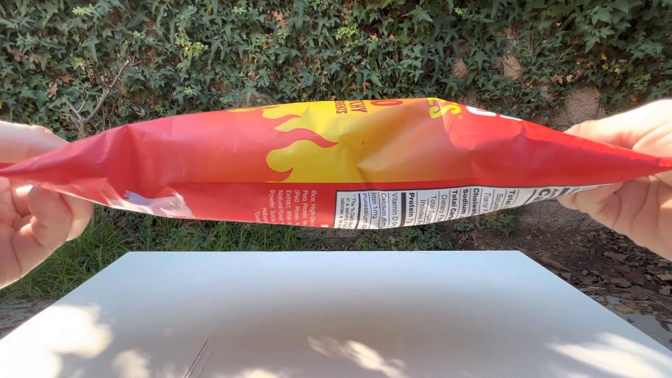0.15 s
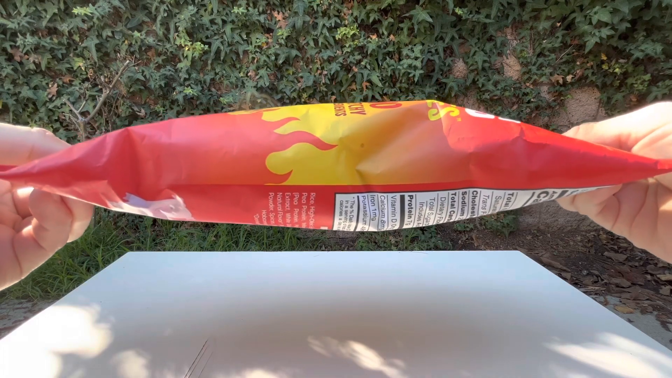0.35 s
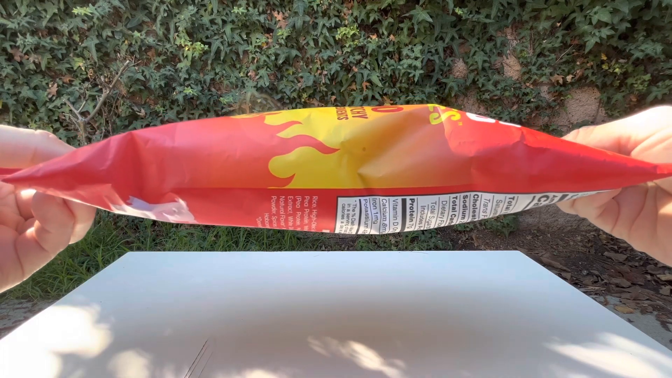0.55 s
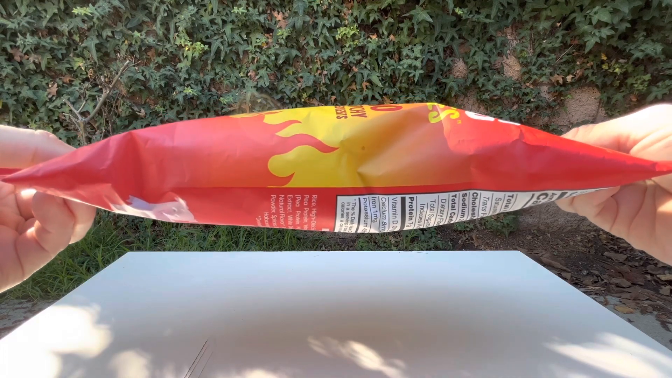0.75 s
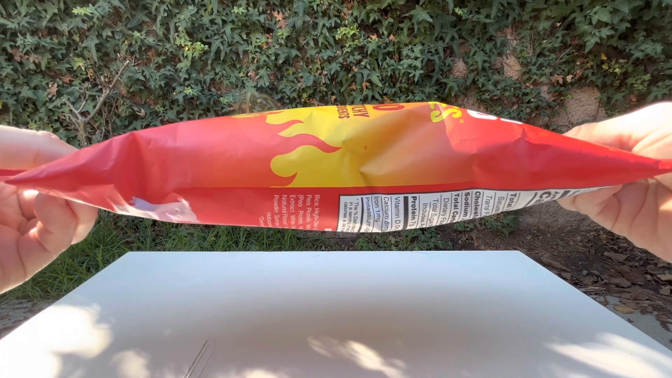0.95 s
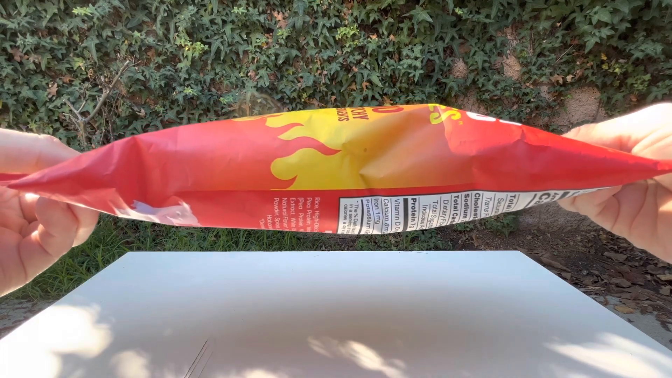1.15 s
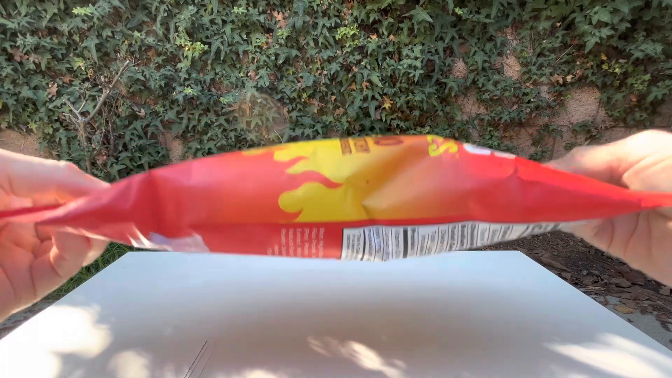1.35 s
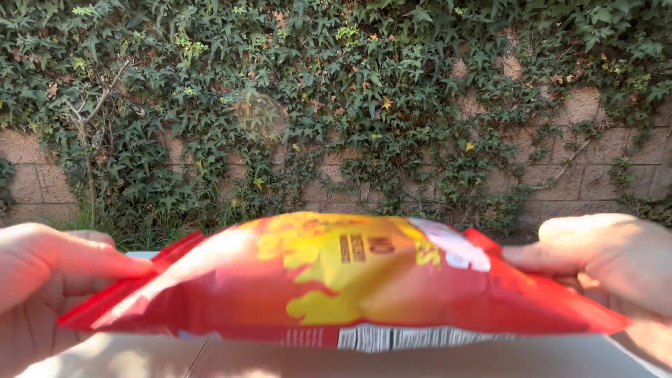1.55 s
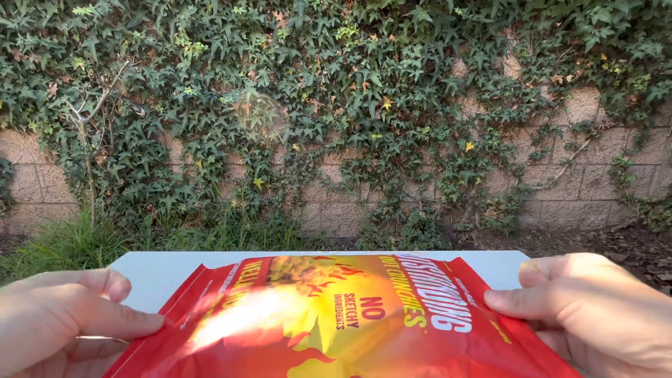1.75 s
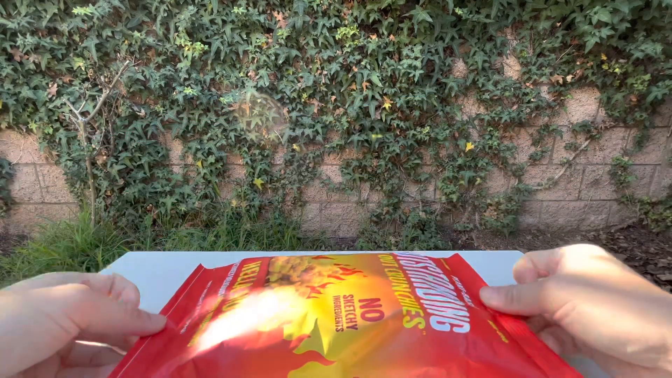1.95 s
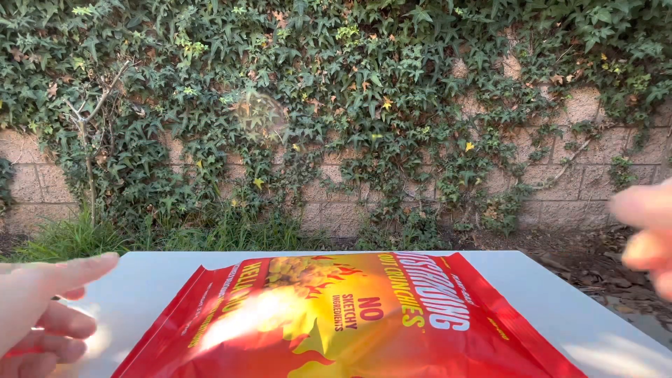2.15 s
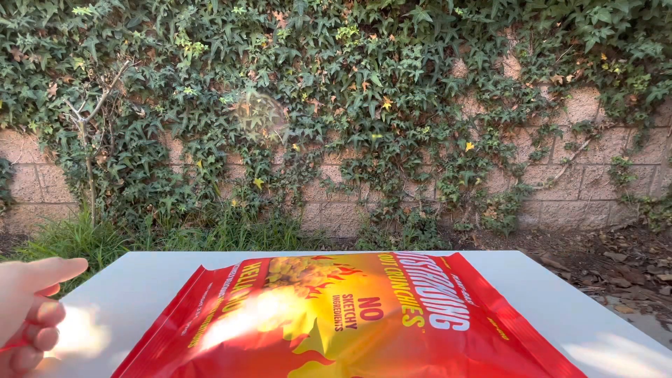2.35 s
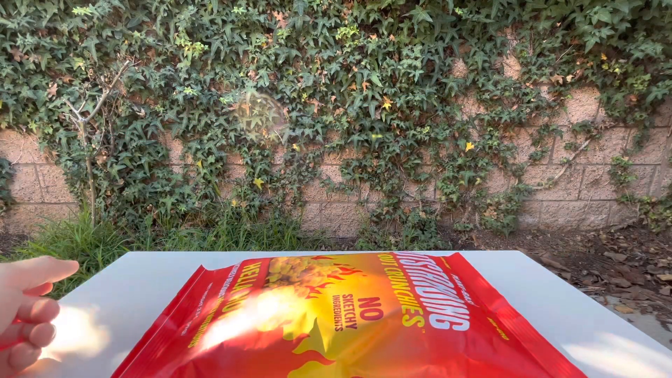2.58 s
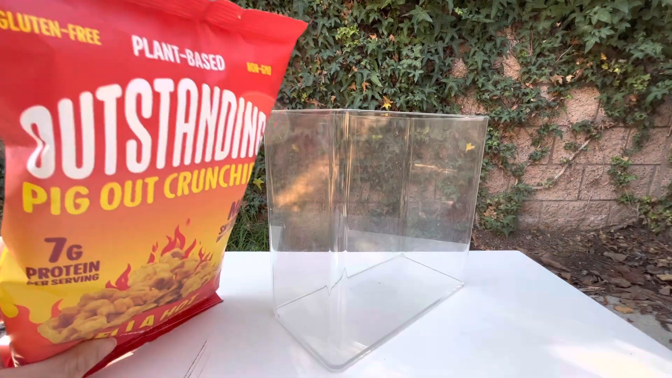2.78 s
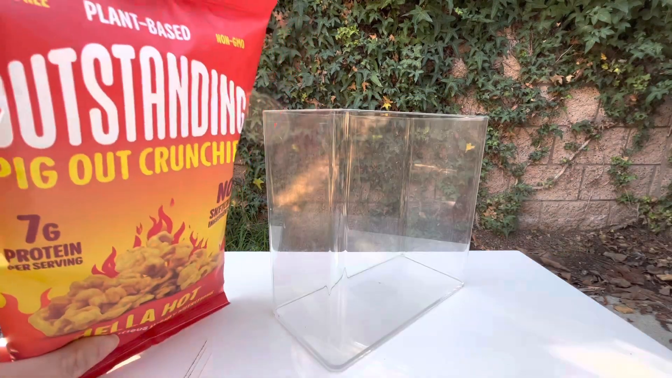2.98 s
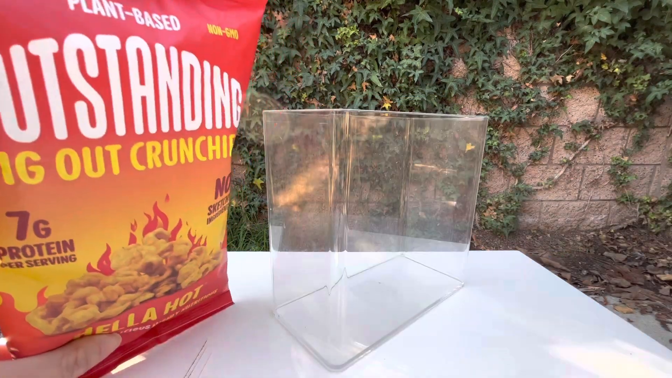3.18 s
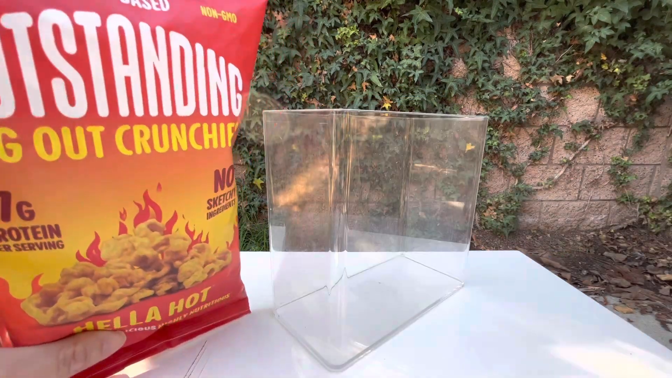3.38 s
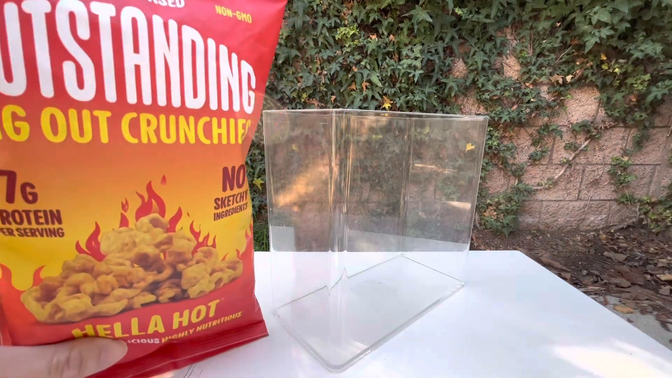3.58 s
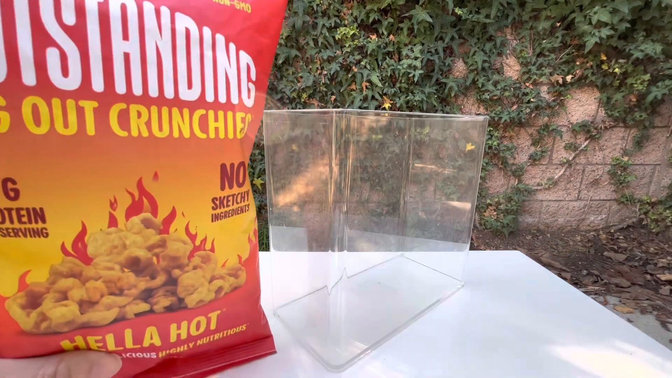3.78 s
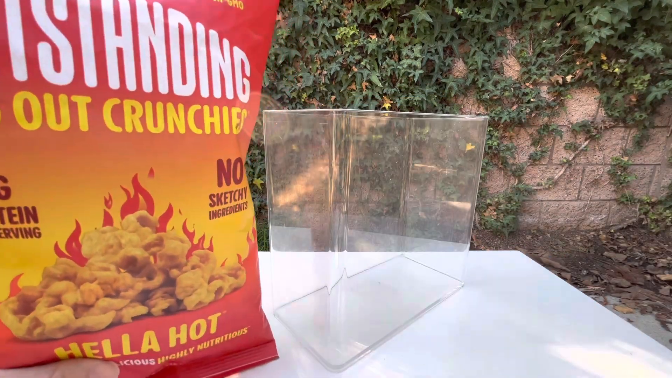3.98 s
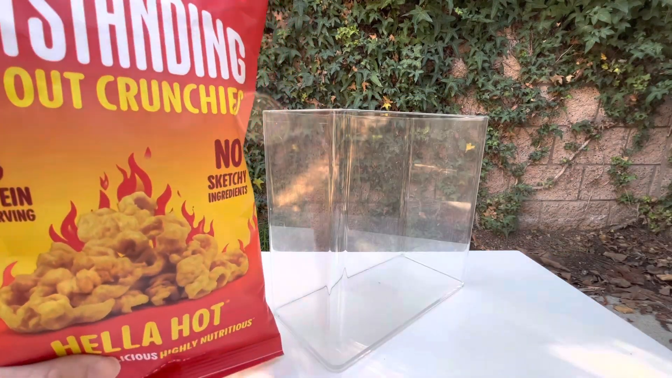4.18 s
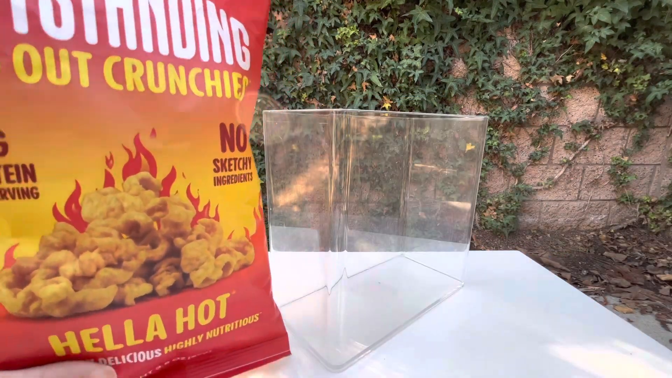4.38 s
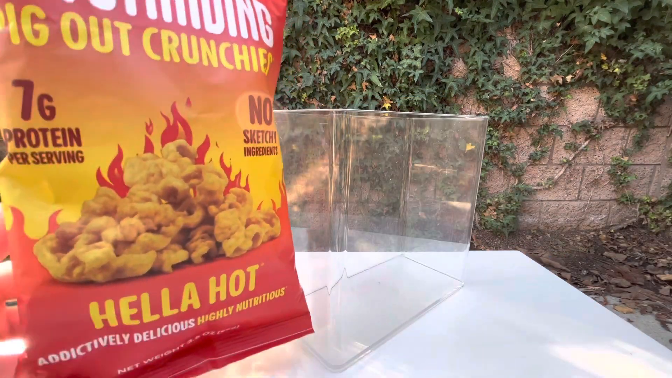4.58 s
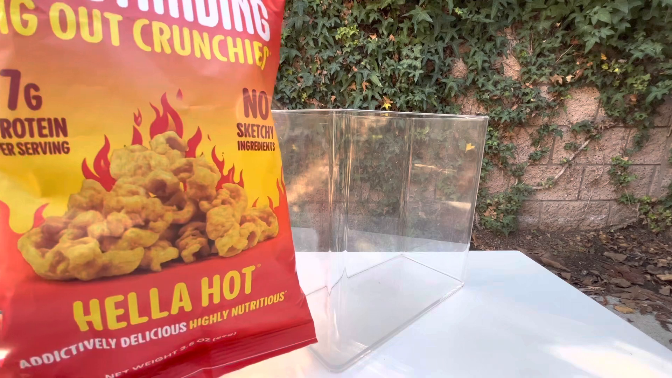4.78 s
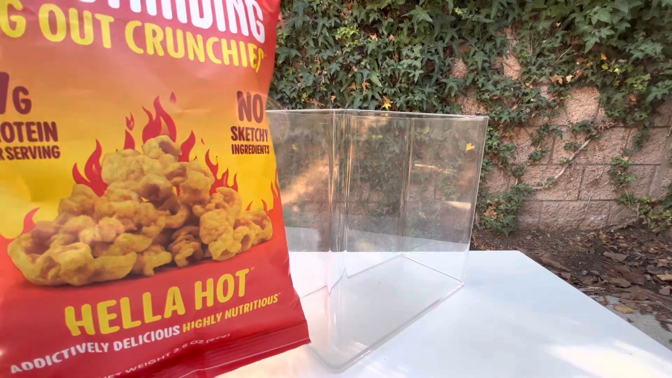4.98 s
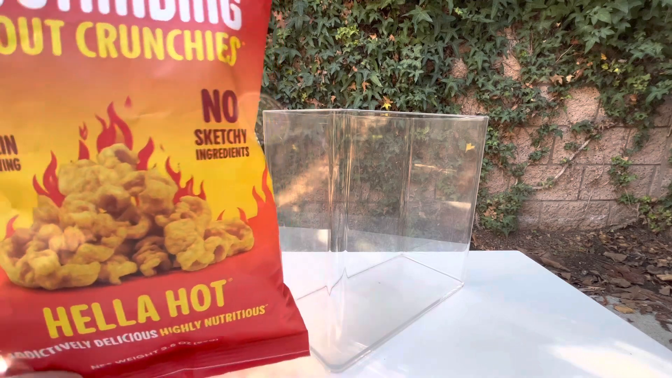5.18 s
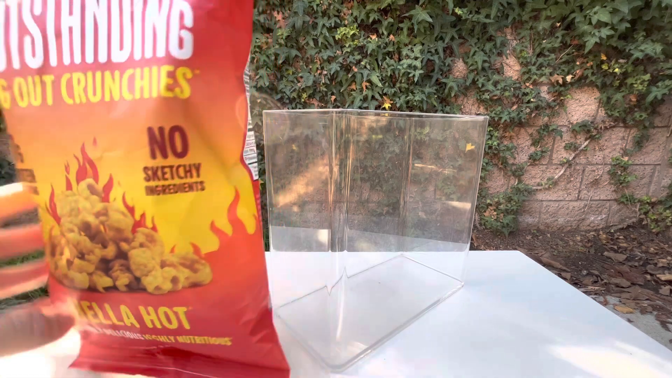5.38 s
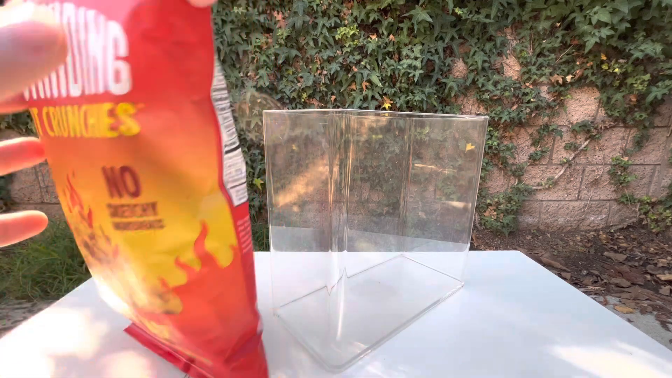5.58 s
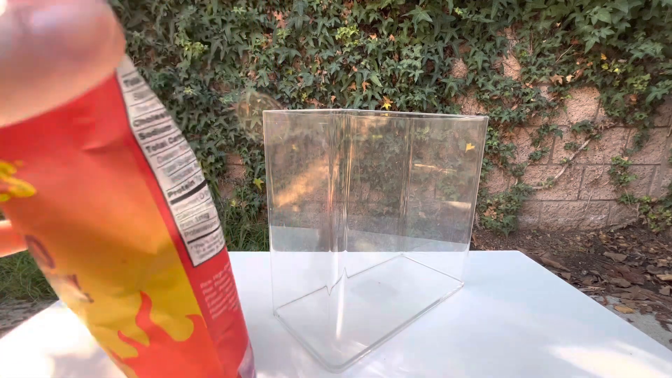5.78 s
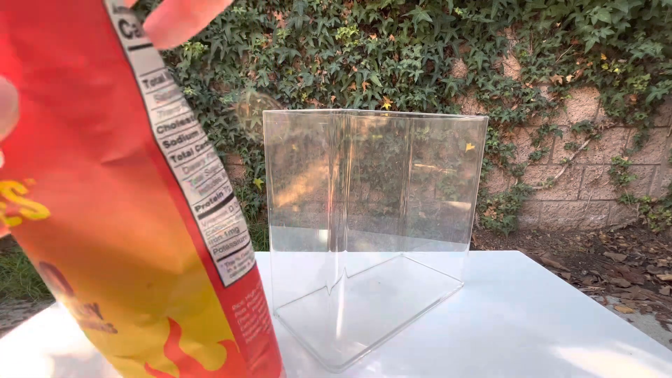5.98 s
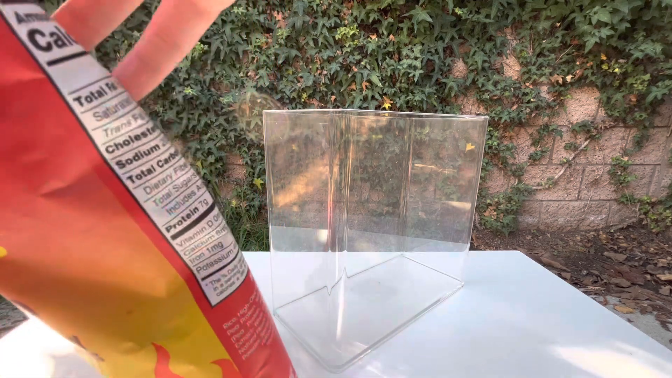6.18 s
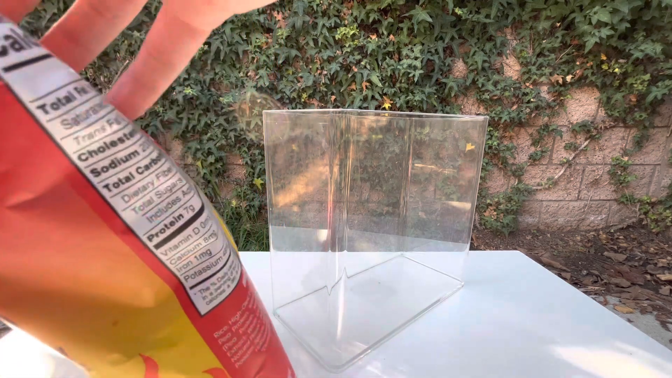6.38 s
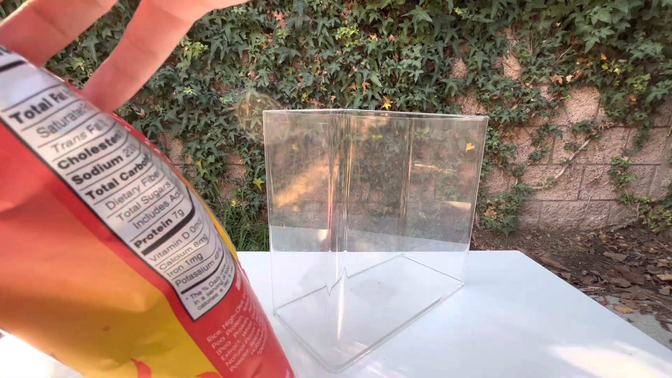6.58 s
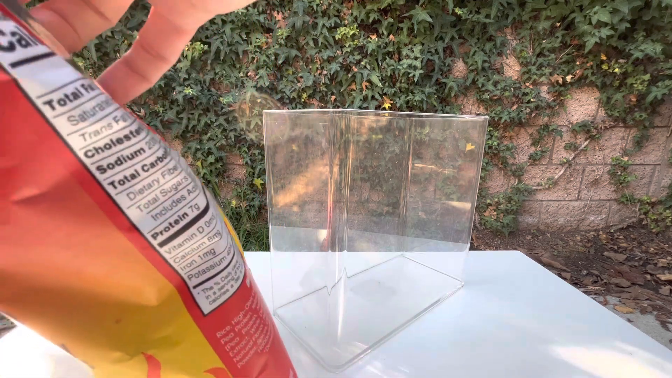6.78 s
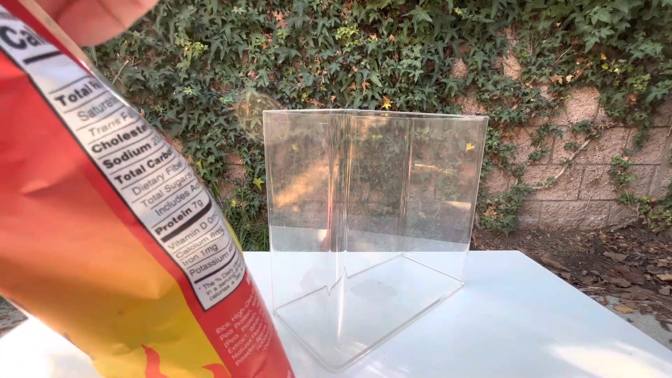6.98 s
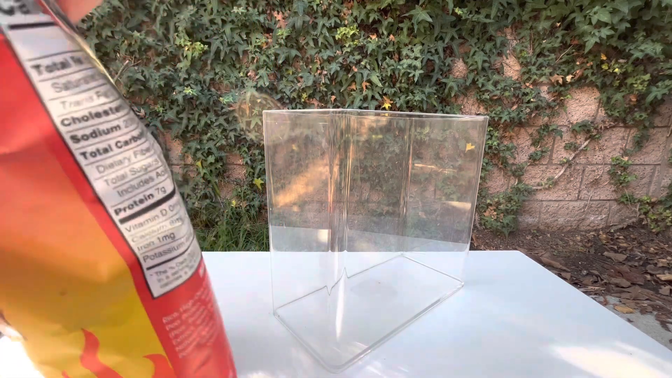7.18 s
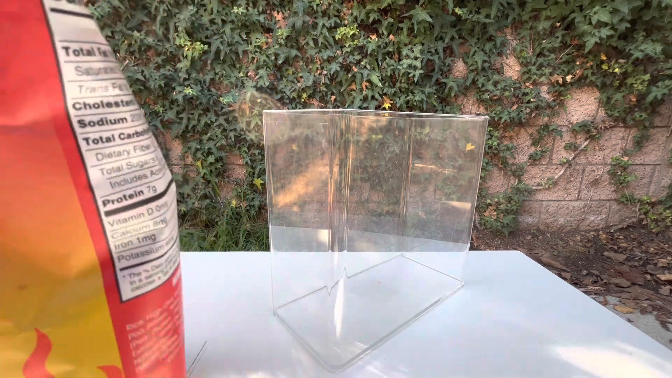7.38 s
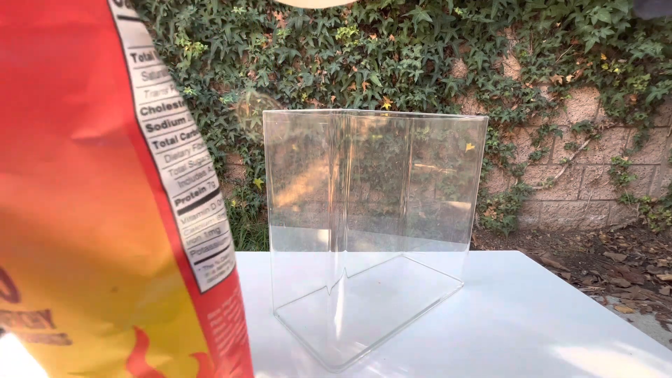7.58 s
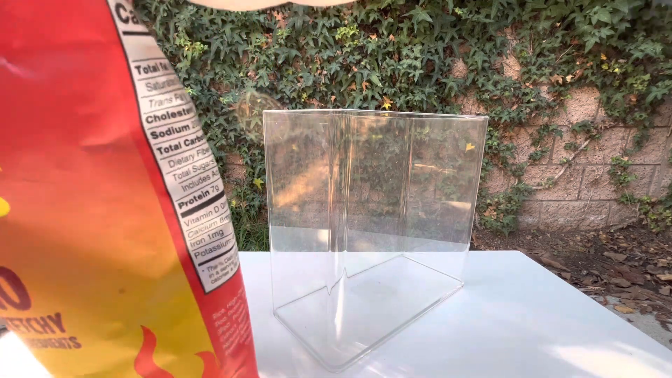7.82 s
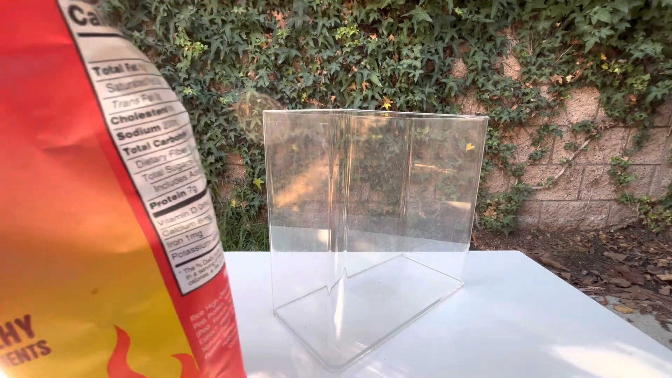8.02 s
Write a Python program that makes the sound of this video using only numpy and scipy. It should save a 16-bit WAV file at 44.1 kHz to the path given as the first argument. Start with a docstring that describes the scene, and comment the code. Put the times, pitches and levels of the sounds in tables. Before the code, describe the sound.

A filled snack bag is handled and tugged close by, sparse film snaps building to continuous bright crackle, with faint birdsong and distant engine hum.

```python
"""A plastic snack bag, left of a close microphone pair, is pulled at both ends, laid on a garden table,
then stood up and tugged at the top. Noise bursts make the sharp snaps of its stiff film, sine swings its thumps;
shaped noise and short rings make the rustle of creases and shifting pieces, fluttering hiss the sliding fingers.
Behind it, shaped noise is outdoor air and gliding tones are a bird. A wavering tone is a low hum at first;
once the scene changes, another is a distant engine that slows and picks up again."""
import sys
import numpy as np
from scipy import signal
from scipy.fft import rfft, irfft
from scipy.io import wavfile
from scipy.ndimage import uniform_filter1d

SR = 44100
rng = np.random.default_rng(int(sys.argv[2]) if len(sys.argv) > 2 else 0)


def int16_out(signal):
    """Quantize to a 16-bit WAV file."""
    q = np.round(np.clip(np.atleast_2d(signal).T, -1, 1) * 32767)
    wavfile.write(sys.argv[1], SR, q.astype(np.int16))


N = 355005
TIME, HZ = np.arange(N) / SR, np.fft.rfftfreq(N, 1 / SR)


def amp(db):
    """Turns decibels into gain."""
    return 10 ** (np.asarray(db) / 20)


def unit(x):
    """Scales a sound to an rms of 1."""
    return x / np.sqrt(np.mean(x ** 2) + 1e-30)


def read(points, hz):
    """Reads a table between its points, on a log-frequency axis."""
    f, value = np.transpose(points)
    return np.interp(np.log(hz + 1), np.log(f + 1), value)


def add(mix, s, sound):
    """Mixes a sound in at time s (seconds)."""
    part = mix[..., max(round(s * SR), 0):][..., :sound.shape[-1]]
    part += sound[..., :part.shape[-1]]


def drift(per_s, step=100):
    """Slow random motion of rms 1: low-passed noise, drawn every few samples and joined by lines."""
    count = N // step + 2
    hz = np.fft.rfftfreq(count, step / SR)
    smooth = np.exp(-(hz / per_s) ** 2)
    slow = irfft(rfft(rng.standard_normal(count)) * smooth, count)
    return np.interp(np.arange(N) / step, np.arange(count), unit(slow))


def pair(x, likeness):
    """Mixes two unrelated signals into left and right spectra that are alike by a set amount."""
    one, other = rfft(x)
    same = np.clip(read(likeness, HZ), -1, 1)
    return np.array([one, same * one + np.sqrt(1 - same ** 2) * other])


# Outdoor air in each scene, before the bass trim. Columns: f/Hz, level/dB per Hz
FIRST_AIR = [(25, -43), (45, -3), (70, -10.5), (105, -3.5), (141, -18.5), (210, -24.5), (320, -26),
             (520, -32.5), (1150, -31), (1600, -35), (2100, -48.5), (2800, -57), (6000, -62.5),
             (16000, -79)]
SECOND_AIR = [(25, -19), (45, -2), (70, -1.5), (92, -0.5), (120, -13), (223, -10), (489, -22.5), (800, -17),
              (1100, -19), (1550, -16.5), (2300, -32), (4000, -39.5), (6500, -60), (13000, -64),
              (16000, -73)]
# How alike the air is at left and right. Columns: f/Hz, likeness (-1 to 1)
AIR_LIKENESS = [(60, 0.78), (130, 0.95), (290, 0.56), (640, -0.46), (1410, -0.15), (6800, 0.059),
                (15000, 0.74)]
FIRST_AIR_DB, SECOND_AIR_DB = -60.5, -51  # level above 150 Hz of left and right averaged


def air(colour, db, bass_db):
    """Far traffic and leaves reach us from all around as almost steady, coloured noise."""
    spectra = pair(rng.standard_normal((2, N)), AIR_LIKENESS) * amp(read(colour, HZ))
    level = np.std(irfft(spectra.mean(0) * (HZ > 150), N))
    bass_trim = amp(bass_db / (1 + (HZ / 130) ** 4))
    waver_db = .3 * drift(4)
    return irfft(spectra * bass_trim, N) / level * amp(db + waver_db)


def drone(hz, level_db, second_db, waver):
    """A low tone and its octave waver together in pitch and level, as turning machines do."""
    phase = 2 * np.pi * np.cumsum(hz * (1 + waver * drift(9.5))) / SR
    tones = np.sin(phase) + amp(second_db) * np.sin(2 * phase)
    return np.sqrt(2) * amp(level_db + 0.9 * drift(4.0)) * tones


# Loudness of the low hum, before trim. Columns: t/s, level/dB
HUM_LEVEL = [(0, -54.5), (.5, -50), (1.2, -60.5), (1.4, -53), (1.75, -51), (2.4, -48), (2.75, -53.5)]
HUM_HZ = 104.8  # average pitch


def hum(trim_db=0.4):
    """A machine somewhere off hums around one pitch, with a faint octave."""
    t, level_db = np.transpose(HUM_LEVEL)
    return drone(HUM_HZ, np.interp(TIME, t, level_db) + trim_db, second_db=-27, waver=0.0054)


def yard(x, db, t60, size=16000):
    """Table and ivy wall scatter the sound: sparse, dull random echoes that fall 60 dB in t60 seconds."""
    t = np.arange(size) / SR
    sparse = rng.standard_normal((2, size)) * (rng.random((2, size)) < 1 / 16)
    echoes = sparse * amp(-60 * t / t60) * (t > .004)
    echoes = signal.lfilter(*signal.butter(1, 4000, fs=SR), echoes)
    return amp(db) * signal.oaconvolve(x, echoes / np.linalg.norm(echoes[0]), axes=1)[:, :N]


# Bird chirps, before pitch smoothing and the direct/echo mix.
# Columns: t/s, length/s, start f/Hz, top f/Hz, end f/Hz, level/dB
CHIRPS = [(.17, .08, 3600, 3780, 3600, -80), (0.598, 0.11, 3530, 3650, 3250, -76),
          (.75, .08, 3640, 3800, 3650, -80), (0.96, .085, 3000, 3650, 2260, -62),
          (2.465, 0.065, 3120, 3260, 2890, -64.5), (2.507, 0.058, 3280, 3760, 3540, -72.5)]


def bird(warble=850):
    """A far bird glides up and down in thin, slightly rough tones, blurred by echoes of the garden."""
    out = np.zeros(N)
    for s, length, start, top, end, db in CHIRPS:
        u = np.linspace(0, 1, int(length * SR))
        hz = uniform_filter1d(np.interp(u, [0, .55, 1], [start, top, end]), SR // 60)
        hz += warble * uniform_filter1d(rng.standard_normal(len(u)), 60)
        swell = np.sin(np.pi * u)
        add(out, s, amp(db) * swell * np.sin(2 * np.pi * np.cumsum(hz) / SR))
    return 0.65 * out + yard(out[None], db=-8, t60=0.23)


# Colour of the bag. Columns: f/Hz, level/dB per Hz
FILM = [(40, -11), (110, 0.5), (200, 1.5), (480, 0.5), (800, -1), (1150, 3), (2000, 1), (2800, -2),
        (5000, -4.5), (7000, -9), (9500, -16), (12000, -15), (14000, -21.5), (16500, -39)]


def film_band(lo, hi, size=2048):
    """The bag's response between two frequencies, starting as promptly as its colour allows (minimum phase)."""
    hz = np.fft.rfftfreq(size, 1 / SR)
    edges = np.sqrt((1 + (lo / (hz + 1)) ** 10) * (1 + (hz / hi) ** 10))
    log_gain = np.log(np.maximum(amp(read(FILM, hz)) / edges, 1e-4))
    circle = np.r_[log_gain, log_gain[-2:0:-1]]
    return np.fft.ifft(np.exp(signal.hilbert(circle).conj())).real[:size // 2]


def facets(size, ring_db=4, width=0.17):
    """Every buckle rings its own patch of film at one broad resonance, added to the plain sound."""
    hz, centre = np.fft.rfftfreq(size, 1 / SR), np.array(SNAPS)[:, -1:]
    return 1 + amp(ring_db) / (1 + 1j * (hz - centre) / (width * centre / 2))


# The loudest buckles; level over 5 ms, before band trims and ring.
# Columns: t/s, level/dB, brightness/dB per octave, ring f/Hz
SNAPS = [(0.413, -50, -4.5, 1890), (1.4007, -44, -4, 4100), (1.4141, -34.5, 2, 2210),
         (1.4335, -38, 1, 3940), (1.4627, -38, -4, 2360), (1.6058, -33.5, 0.7, 3980),
         (1.621, -29.5, 5, 3120), (1.7655, -30.5, 0.6, 1130), (1.78, -28, -2, 3020),
         (1.8377, -25, -0.8, 1580), (1.8644, -39.5, -2.5, 1730), (1.9921, -30.5, -3.5, 1110),
         (2.0142, -40.5, -2.5, 1210), (2.396, -67, -14, 1100), (2.6563, -47, -7, 1460),
         (2.9264, -41, -4, 1110), (2.9618, -37, -5.5, 1930), (3.209, -39, 1.7, 1120),
         (3.4923, -41.5, 4.5, 4390), (4.0656, -38.5, -3.5, 1716), (4.1483, -33.5, -0.7, 1850),
         (4.1725, -34.5, -3, 1990), (4.1836, -47.5, -8.5, 1200), (4.2544, -26.5, 0, 1590),
         (4.298, -34.5, -4.7, 1620), (4.3038, -37, 1, 1600), (4.3653, -30.5, -0.5, 1430),
         (4.3718, -31.5, 0, 1980), (4.4429, -31.5, -1.5, 1520), (4.5423, -29.5, 0, 4380),
         (4.562, -36, -6, 1100), (4.569, -32, 0.5, 2300), (4.589, -32.5, -4.5, 3380),
         (4.628, -38, -4, 4030), (4.695, -41, -4, 2700), (4.852, -29, 3, 3600), (5.0703, -35, 2.5, 1165),
         (5.1188, -38, 0.3, 2180), (5.1643, -23.5, -1, 2650), (5.2661, -38.0, -3.5, 1250),
         (5.3291, -33.5, 6.5, 4520), (5.385, -31, 1, 1420), (5.3951, -28, 0.2, 2300),
         (5.4043, -35, -6, 1180), (5.4622, -40.5, -6, 1230), (5.564, -25, -1, 1530),
         (5.6026, -34.5, -2.5, 1790), (5.6328, -31.5, 3.5, 1427), (5.658, -32, -3.1, 2050),
         (5.677, -33.0, 2, 2000), (5.6992, -20.5, 0.5, 1360), (5.7225, -33, 3.5, 5300),
         (5.7381, -23, 1.5, 4700), (5.803, -34, -3, 1210), (5.9566, -28.5, 2.5, 1275),
         (5.979, -19.5, 0.1, 1960), (5.9955, -20.0, 1.7, 1730), (6.018, -28.5, -1.5, 2210),
         (6.091, -23, 0.3, 1600), (6.139, -33, -4, 2020), (6.1459, -28.5, -1.2, 1840),
         (6.2834, -20.5, 1.5, 4030), (6.3165, -26, 0.5, 2100), (6.3289, -22.0, -1.5, 1990),
         (6.3512, -24.5, 0.9, 1390), (6.3767, -31, 0.0, 1800), (6.3841, -26.5, 0, 3530),
         (6.4286, -20.5, 2, 1850), (6.4709, -23.5, 0, 1740), (6.538, -21, 0, 2000), (6.605, -20, 0.5, 1313),
         (6.6321, -27.0, -2.5, 1350), (6.672, -23, 0.5, 1900), (6.6854, -22.5, -0.5, 1830),
         (6.692, -20, -0.8, 4900), (6.7402, -27.0, -1.3, 1710), (6.8004, -20, 1.3, 1940),
         (6.8335, -26, 0, 2000), (6.8583, -30.5, 0, 1990), (6.9182, -24, 3.5, 1940), (6.9305, -25, 2, 3420),
         (6.979, -30.5, -0.8, 1750), (7.036, -27.0, -3.0, 1950), (7.0604, -22, -0.2, 1596),
         (7.1078, -30.5, 5, 3310), (7.1125, -27.5, 2.8, 4060), (7.138, -17.5, 0.2, 3300),
         (7.1501, -18, 2.5, 3760), (7.1577, -22.5, 2.5, 4900), (7.1649, -17, 0, 1620),
         (7.197, -34, -6, 1260), (7.2322, -31, 1.5, 1387), (7.2838, -26, -1.5, 1280),
         (7.321, -24.5, 6, 5460), (7.387, -29, 3, 4495), (7.4015, -20.5, -1.5, 1720),
         (7.408, -24, 1.5, 1312), (7.4334, -27, 2.5, 4780), (7.448, -26, 4, 6730),
         (7.4666, -22.5, -2, 1960), (7.4912, -25.5, -2, 1880), (7.5276, -30.0, -4, 1620),
         (7.553, -15, 1.3, 1526), (7.5869, -31.5, 2.5, 4050), (7.6287, -27, -2.7, 1570),
         (7.6667, -25.5, 3.5, 6670), (7.7596, -18, 0.5, 1830), (7.7665, -33, 8, 4270),
         (7.801, -24.5, 4, 5290), (7.8107, -22.5, -4.5, 1140), (7.8377, -23.5, -0.5, 4960),
         (7.8501, -19, 4.5, 6250), (7.858, -26.5, -1, 1330), (7.8903, -26.5, 3.5, 4570),
         (7.905, -24, 2, 2560), (7.9259, -20, 1.7, 3170), (7.95, -27.5, 5, 1260), (8.0348, -35.5, 6, 5700)]
SHORTEN = 0.044  # share by which a buckle dies sooner for each dB per octave of brightness


def snap_band(octave, lo, hi, rise, decay, tail_db, tail_decay, db, size=2048):
    """One band of the buckles: a brief burst, then a weak shiver; brightness tilts bands by octave from the middle."""
    t, out = np.arange(size) / SR, np.zeros((2, N))
    span = size + size // 2  # room for the film's response
    noise = rng.standard_normal((len(SNAPS), 2, size))
    brightnesses = np.array(SNAPS)[:, 2]
    stretch = np.exp(0.24 * rng.standard_normal(len(SNAPS)) - SHORTEN * brightnesses)[:, None, None]
    burst_fade = np.exp(-t / (decay * stretch))
    shiver = amp(tail_db) * np.exp(-t / tail_decay)
    shape = (1 - np.exp(-t / rise)) ** 2 * (burst_fade + shiver)
    plain = rfft(noise * shape, span) * rfft(film_band(lo, hi), span)
    # energy of the first 10 ms, as if packed into 5 ms
    power = (irfft(plain)[..., :SR // 100] ** 2).sum(-1, keepdims=True) / (.005 * SR)
    bursts = irfft(plain * facets(span)[:, None])[..., :size] / np.sqrt(power)
    for (s, level_db, brightness, _), burst in zip(SNAPS, bursts):
        add(out, s, amp(level_db + brightness * octave + db) * burst)
    return out


# Where the bag's bands meet. Column: f/Hz
SPLITS = [900, 2800, 7000]


def snaps():
    """The film snaps in four bands: treble leaves it at once, the air in the bag booms longer."""
    a, b, c = SPLITS
    # rise and decays in seconds
    return (snap_band(-1.7, 0, a, rise=0.00095, decay=0.0043, tail_db=-13, tail_decay=0.011, db=-5.5)
            + snap_band(-0.76, a, b, rise=0.000064, decay=0.0029, tail_db=-19, tail_decay=0.0038, db=-4.0)
            + snap_band(0.56, b, c, rise=0.00015, decay=0.0015, tail_db=-20.5, tail_decay=0.007, db=-2)
            + snap_band(2.24, c, SR, rise=0.00026, decay=0.0014, tail_db=-32, tail_decay=0.015, db=-10.5))


FLEX_SHAPE = 2.18  # 1 = pointed, 2 = bell


def swells(rows):
    """Adds the power of overlapping hand movements (t/s, half length/s, level/dB), rising and fading alike."""
    t, power = TIME[::20], 0
    for s, half, db in rows:
        power = power + amp(db) ** 2 * np.exp(-np.minimum(abs((t - s) / half) ** FLEX_SHAPE, 60))
    return np.interp(TIME, t, power)


# Each flex of the bag swells a rustle: bright where film creases, dull where the pieces shift inside.
# Columns: t/s of its height, half length/s, level/dB before band trims, brightness/dB per octave
FLEXES = [(1.45, 0.037, -51.5, -2), (1.624, 0.036, -50, 0.5), (1.771, 0.031, -29, -1.5),
          (1.826, 0.036, -36, 0), (1.978, 0.06, -44, -2), (2.144, 0.097, -60.5, 0.5), (2.678, .03, -69, 1),
          (2.954, 0.032, -52.5, 0), (3.496, 0.43, -60, -5), (4.113, 0.085, -48, -3.5),
          (4.351, 0.059, -40, -3), (4.586, 0.061, -38.5, -2), (4.76, 0.28, -54.5, -3),
          (5.293, 0.047, -42.5, -4), (5.423, 0.071, -52.5, -9), (5.6, 0.024, -28.5, -1.5),
          (5.721, 0.039, -31, 0), (5.869, 0.04, -36.5, -2.5), (6, 0.031, -25, -1.5),
          (6.11, 0.036, -30.5, -1.5), (6.262, 0.019, -30.5, -1), (6.336, 0.031, -27, -0.5),
          (6.475, 0.057, -38.5, -3), (6.606, 0.04, -39.5, -1.5), (6.69, 0.013, -22.5, 2),
          (6.767, 0.013, -27.5, -1), (6.848, 0.024, -32, -0.5), (6.952, 0.037, -31, -1),
          (7.172, 0.07, -27, 0), (7.256, 0.09, -32.5, -1), (7.404, 0.029, -36.5, -0.5),
          (7.55, 0.048, -33.5, -0.5), (7.658, 0.041, -32.5, -1), (7.77, 0.044, -28.5, 0.5),
          (7.842, 0.015, -26.5, -1.5), (7.958, 0.047, -30.5, -2)]
SETTLE_DB, SETTLE_S = -15.5, 0.014  # after a buckle the film settles in a dying flurry of creases
SETTLE_OCTAVE = .6  # dB less settling per dB/octave of brightness: small stiff patches stir little film
GRIP_S, GRIP_DB = 5.56, -45  # from here the hands keep the top of the bag under tension


def crumpling(octave):
    """Rustle strength in one band: flexes, held grip, and settling after buckles, strongest after dull ones."""
    s, level_db, brightness, _ = np.transpose(SNAPS)
    kick_db = level_db + brightness * (octave / 2 - SETTLE_OCTAVE) + SETTLE_DB
    kicks = np.bincount((s * SR).astype(int), amp(kick_db) ** 2, N)[:N]
    settling = signal.lfilter([1], [1, -np.exp(-2 / (SETTLE_S * SR))], kicks + 1e-20)
    flexing = swells([(t, half, db + tilt * octave) for t, half, db, tilt in FLEXES])
    grip = amp(GRIP_DB) ** 2 * (TIME > GRIP_S)
    return np.sqrt(flexing + settling + grip)


def rustle_band(creases, lo, hi, decay, rub, db):
    """Tiny creases fade quickly over the steady rub of film on fingers, all as noise coloured by the bag."""
    power = signal.lfilter([1], [1, -np.exp(-2 / (decay * SR))], creases)
    power = power / (uniform_filter1d(power, SR // 16) + 1e-9) + rub  # evened out over 1/16 s
    noise = np.sqrt(abs(power)) * rng.standard_normal((2, N))
    grains = signal.oaconvolve(noise, film_band(lo, hi)[None], axes=1)[:, :N]
    return unit(grains) * amp(db)


def rustle(per_s=400, spread_db=4.0):
    """One train of creases, mostly small and a few large, sounds in all bands; treble dies first."""
    sizes = amp(spread_db * np.minimum(rng.exponential(1, N), 4)) ** 2
    creases = (rng.random(N) < per_s / SR) * sizes
    a, b, _ = SPLITS
    return (crumpling(-1.6) * rustle_band(creases, 0, a, decay=.005, rub=0.19, db=-5.5)
            + crumpling(-0.6) * rustle_band(creases, a, b, decay=.0028, rub=0.049, db=-5.5)
            + crumpling(0.92) * rustle_band(creases, b, SR, decay=.0015, rub=0.08, db=-8))


def crinkles(per_s=150, spread_db=4.5, cycles=4.0, lo_hz=1100, hi_hz=6000, db=-8):
    """Small patches of film pop singly, each ringing a few cycles at its own pitch."""
    t, out = np.arange(SR // 50) / SR, np.zeros((2, N))
    for when, pitch, size, *phase in rng.random((int(per_s * N / SR), 5)):
        hz = lo_hz * (hi_hz / lo_hz) ** pitch
        size_db = read(FILM, hz) + spread_db * min(-np.log(1 - size), 3)
        ring = np.exp(-t * hz / cycles) * np.sin(2 * np.pi * (hz * t + np.c_[phase]))
        add(out, when * N / SR, amp(size_db) * hz * ring)
    return unit(out) * crumpling(1) * amp(db)


# Fingers slide over the film; level before trim. Columns: t/s of fastest moment, half length/s, level/dB
SLIDES = [(1.28, .07, -75.5), (1.65, 0.13, -68), (2.13, 0.1, -57.5), (2.95, 0.097, -64.5),
          (3.23, 0.037, -64), (3.45, 0.025, -57), (3.7, 0.14, -75), (4.07, 0.063, -64), (4.42, 0.094, -53),
          (4.62, 0.084, -58), (5.28, .13, -52.5), (5.85, .1, -48.5), (7.3, 0.89, -52.5)]
# Colour of the sliding hiss. Columns: f/Hz, level/dB per Hz
HISS = [(500, -28), (1500, -5), (2500, -5.5), (3400, -2.5), (4200, 4.5), (5700, -4), (6600, 0.5),
        (7700, -17), (8700, -4), (12500, -16.5), (13900, -9), (15000, -44)]


def slide(flutter_db=2.0, trim_db=-0.5):
    """Fingers rub a fine hiss from the film, and it flutters with the grip."""
    hiss = unit(irfft(rfft(rng.standard_normal((2, N))) * amp(read(HISS, HZ)), N))
    return hiss * np.sqrt(swells(SLIDES)) * amp(trim_db + flutter_db * drift(40))


# The air-filled bag thumps when a large panel flips; peak level before the soft start.
# Columns: t/s, f/Hz, level/dB, decay/s
THUMPS = [(2.396, 636, -37, .004), (4.585, 200, -20.5, 0.0066), (5.166, 244, -38, .01),
          (6.613, 280, -21.5, 0.0092), (6.695, 195, -27.5, 0.014), (7.168, 235.5, -24.5, 0.016),
          (7.555, 221.4, -12.5, 0.0055), (7.81, 185, -21.5, 0.024)]


def thumps(rise=0.00041):
    """A panel makes a few heavily damped swings on its cushion of air."""
    t, out = np.arange(SR // 6) / SR, np.zeros((2, N))
    for s, hz, db, decay in THUMPS:
        swing = np.sin(2 * np.pi * (hz * t + rng.random((2, 1))))
        add(out, s, amp(db) * swing * (1 - np.exp(-t / rise)) * np.exp(-t / decay))
    return out


# Distant engine, slowing and picking up again. Columns: t/s, firing f/Hz, level/dB
ENGINE = [(2.78, 55, -64), (2.85, 57.5, -59), (2.91, 63.5, -69), (3.59, 62.6, -43), (3.88, 62.7, -59),
          (4.01, 58.2, -58.5), (4.08, 59, -42), (4.28, 54.06, -46), (4.81, 46.8, -50), (5.3, 45.0, -46.5),
          (5.47, 44.4, -58), (5.7, 43.4, -52), (5.79, 48.4, -54), (6.54, 46.3, -57), (6.79, 50.55, -47.5),
          (7.42, 51.8, -37), (7.64, 50.9, -42.5), (8.05, 51.9, -40)]


def engine():
    """Only the firing rate of the far engine and its octave carry into the garden."""
    t, hz, level_db = np.transpose(ENGINE)
    return drone(np.interp(TIME, t, hz), np.interp(TIME, t, level_db), second_db=-10.5, waver=0.011)


# The near bag, left over right, before scaling by shade. Columns: f/Hz, level/dB
NEAR_BALANCE = [(60, 1), (200, 3.5), (700, 2), (1300, 3), (2300, 4.5), (4500, 9.5), (6500, 8), (8500, 2.5),
                (10000, -1), (15000, 0.5)]
# How alike the near bag is at left and right. Columns: f/Hz, likeness (0 to 1)
NEAR_LIKENESS = [(100, 0.35), (600, 0.76), (1800, 0.31), (3000, 0.057), (7000, 0.87), (11000, 0.1),
                 (15000, 0.21)]


def near(x, shade, lag_ms):
    """The bag is to the left: the right microphone hears it later and shaded."""
    spectra, ratio = pair(x, NEAR_LIKENESS), amp(shade * read(NEAR_BALANCE, HZ))
    lag = lag_ms / 1000 / (1 + (HZ / 9000) ** 12)  # the delay vanishes in the top treble
    delay = np.exp(-2j * np.pi * HZ * lag)
    keep_power = np.sqrt(2 / (1 + ratio ** 2))
    return irfft(spectra * np.array([ratio, delay]) * keep_power, N)


CUT_S = 2.755  # the second scene starts here, over 10 ms


def scene():
    """The bag is first a little to the left, then further left; the background changes with it."""
    later = np.clip((TIME - CUT_S) / .01, 0, 1)
    bag = snaps() + thumps() + rustle() + crinkles() + slide()
    bag = near(bag * (1 - later), shade=0.91, lag_ms=0.227) + near(bag * later, shade=1.5, lag_ms=0.399)
    first = air(FIRST_AIR, FIRST_AIR_DB, bass_db=-10.5) + hum()
    second = air(SECOND_AIR, SECOND_AIR_DB, bass_db=-4) + engine()
    return bag + yard(bag, db=-24, t60=0.15) + bird() + first * (1 - later) + second * later


EDGE_HZ = 16100  # upper band limit


def record(dry):
    """Peaks round off near full scale; then a steep filter removes the top treble."""
    band_limit = signal.firwin(301, EDGE_HZ, window=("kaiser", 8), fs=SR)
    return signal.oaconvolve(np.tanh(dry), band_limit[None], "same")


dry = scene()
out = record(dry)
int16_out(out)
```